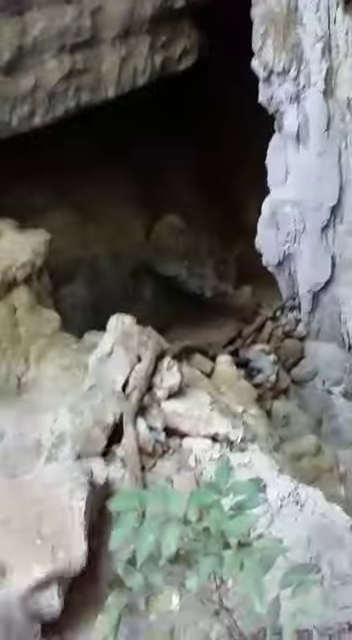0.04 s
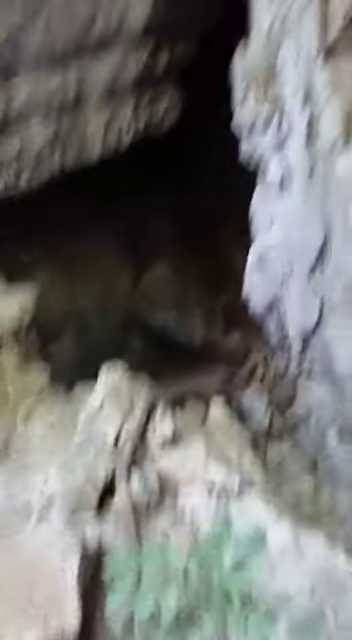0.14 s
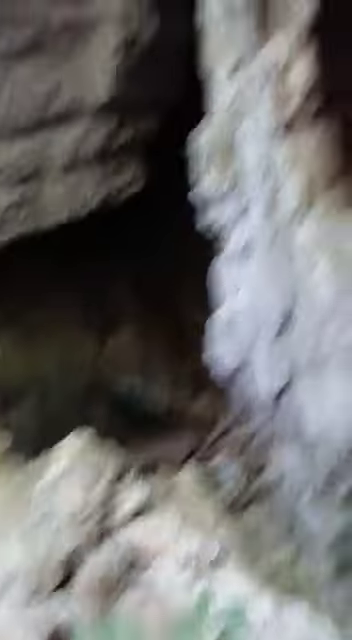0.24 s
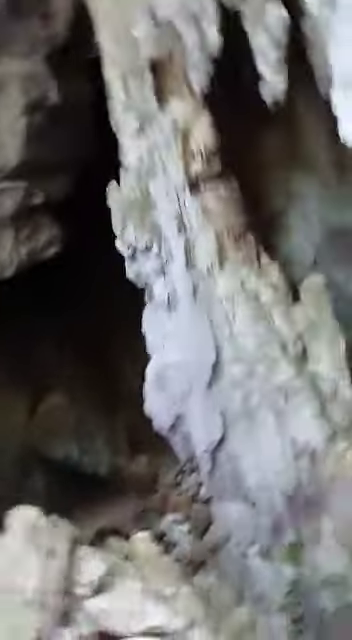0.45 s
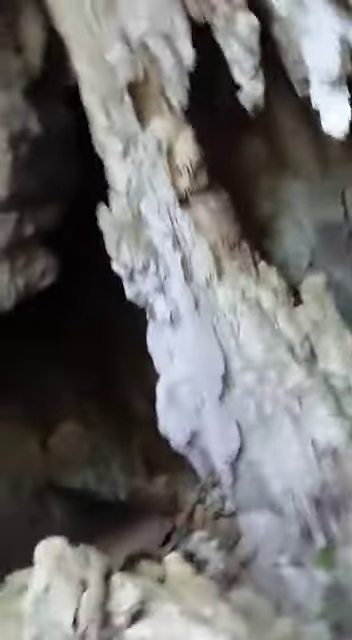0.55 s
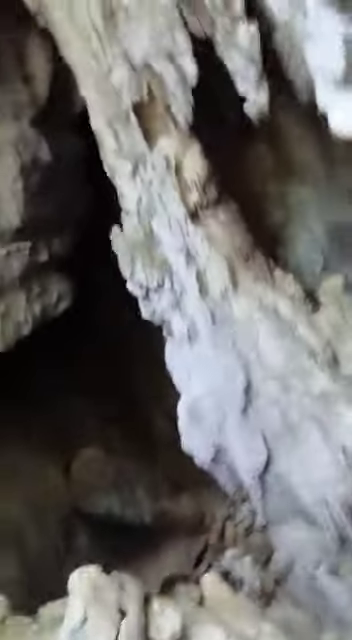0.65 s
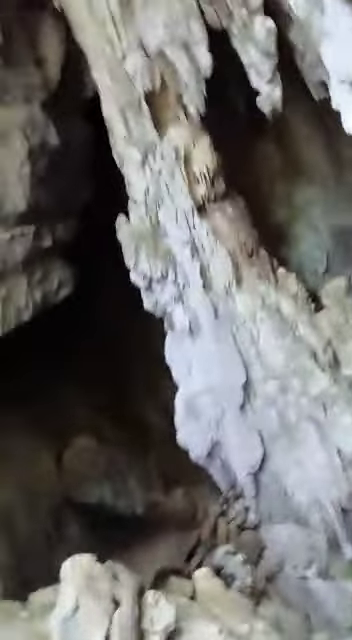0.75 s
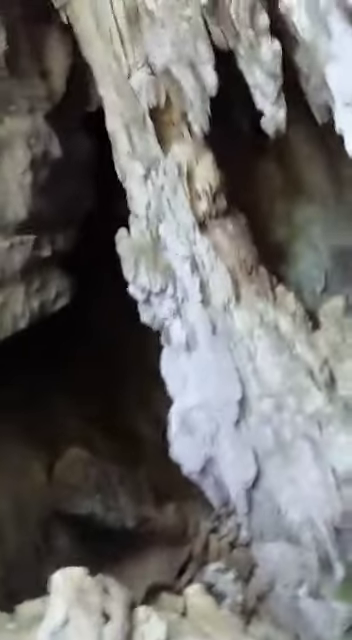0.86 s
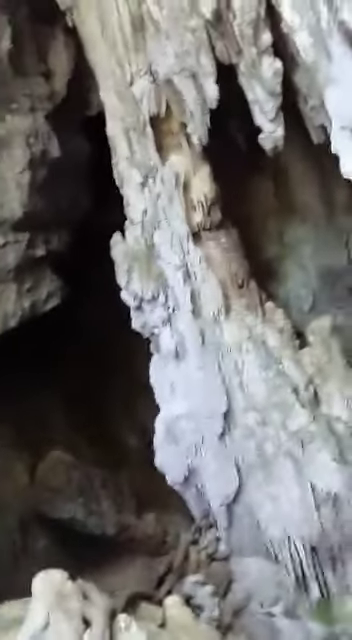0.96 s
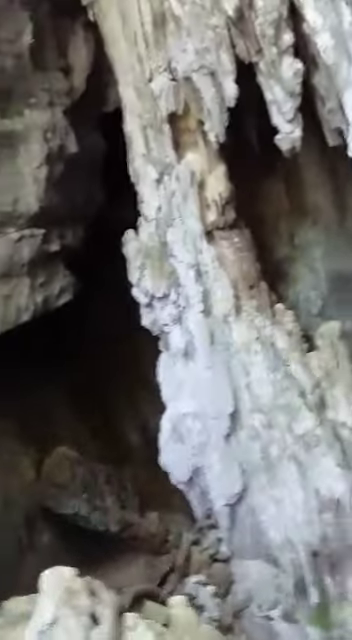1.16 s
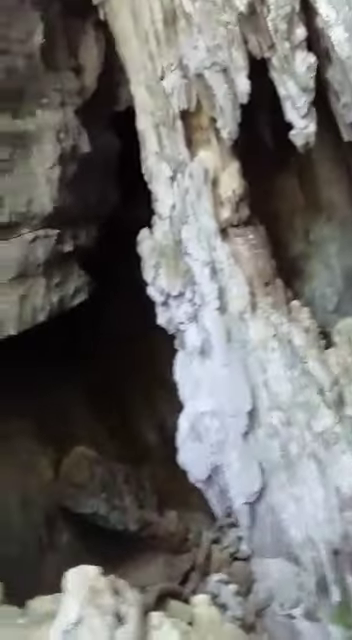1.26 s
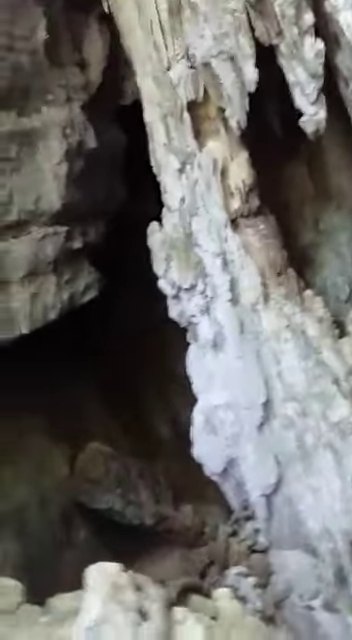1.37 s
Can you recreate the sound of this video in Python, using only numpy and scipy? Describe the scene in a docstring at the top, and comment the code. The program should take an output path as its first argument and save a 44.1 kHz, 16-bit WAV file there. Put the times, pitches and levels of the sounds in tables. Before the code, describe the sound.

A foot crunches down on loose rock and dry litter with brittle cracks and a small stone knock, then scuffs and settles softly. The cave mouth adds a short echo, over faint hiss and insects.

```python
"""A step at a limestone cave mouth

A foot comes down on loose rock and dry litter: brittle bits crack, a stone rings in its modes,
grit crunches as a swarm of tiny fractures, and the feet scuff and settle with soft thuds.
The rock walls answer with a short echo; insects shrill in narrow bands over a faint hiss."""
import sys
import numpy as np
from scipy import signal
from scipy.fft import rfft, irfft, next_fast_len
from scipy.io import wavfile

SR = 44100
rng = np.random.default_rng(int(sys.argv[2]) if len(sys.argv) > 2 else 0)


def store_pcm(level_fs):
    """Save levels as 16-bit WAV."""
    pcm = np.round(np.clip(level_fs, -1, 1) * 32767).astype(np.int16)
    wavfile.write(sys.argv[1], SR, np.atleast_2d(pcm).T)


N = 61739
TIME = np.arange(N) / SR


def from_db(db):
    """Amplitude grows tenfold for every 20 dB."""
    return 10 ** (np.asarray(db) / 20)


def unit_rms(x):
    """Normalisation to a mean power of one."""
    return x / np.sqrt(np.mean(x ** 2) + 1e-20)


def decay(t, t60):
    """Exponential damping: 60 dB in t60 seconds, from t = 0."""
    return np.exp(-np.log(1000) * np.maximum(t, 0) / max(t60, 1e-4))


def envelope(t, attack, hold, t60):
    """A transient rises linearly, holds, then decays exponentially."""
    return np.clip(t / max(attack, 1e-5), 0, 1) * decay(t - attack - hold, t60)


def strokes(rows):
    """The envelopes of overlapping foot movements add."""
    return sum(from_db(db) * envelope(TIME - s, attack, hold, t60) for s, db, attack, hold, t60 in rows)


def colour(x, spectrum):
    """Causal, minimum-phase filtering through (frequency_hz, gain_db) points."""
    size = 2 * next_fast_len(len(x))
    hz, db = np.transpose(spectrum)
    grid_hz = np.maximum(np.arange(size // 2 + 1) * SR / size, 1)
    gain = from_db(np.interp(np.log(grid_hz), np.log(hz), db))
    cepstrum = irfft(np.log(gain))
    cepstrum[1:size // 2] *= 2  # folding onto positive time gives minimum phase
    cepstrum[size // 2 + 1:] = 0
    return irfft(rfft(x, size) * np.exp(rfft(cepstrum)))[:len(x)]


def grains(spectrum, per_s, spread_db, t60_s=0.0029):
    """Shot noise: tiny fractures of uneven size come at random, and their decaying powers add."""
    sizes = from_db(spread_db * np.minimum(rng.exponential(1, N), 5))
    onsets = rng.random(N) < per_s / SR
    power = signal.lfilter([1], [1, -decay(1 / SR, t60_s) ** 2], onsets * sizes ** 2 + 1e-18)
    return unit_rms(colour(np.sqrt(power) * rng.standard_normal(N), spectrum))


def hiss(spectrum, level_db=0):
    """Filtering white noise gives stationary coloured noise."""
    noise = colour(rng.standard_normal(N + SR), spectrum)[SR:]
    return from_db(level_db) * unit_rms(noise)


def drift(knots_per_s):
    """Linear interpolation between Gaussian values gives a smooth random wander."""
    knots = rng.standard_normal(400)
    return np.interp(TIME * knots_per_s, np.arange(len(knots)), knots)


def shrill(hz, width_hz, db, waver_db, steadiness):
    """Far insects as narrow-band noise; compressing its envelope evens it towards a tone."""
    band = signal.butter(2, [hz - width_hz / 2, hz + width_hz / 2], "band", fs=SR, output="sos")
    noise = unit_rms(signal.sosfilt(band, rng.standard_normal(2 * SR + N)))
    analytic = signal.hilbert(noise)[SR:SR + N]
    evened = analytic.real / (np.abs(analytic) + .5) ** steadiness
    return from_db(db + waver_db * drift(knots_per_s=23)) * unit_rms(evened)


def air():
    """Broadband outdoor hiss sets the ambient noise floor."""
    # hiss spectrum: frequency_hz, gain_db
    spectrum = [(25, -29), (50, -7), (85, 1), (160, -4), (250, -15), (450, -17.5), (1000, -13), (1500, -8),
                (2100, 3), (2700, -1.5), (5200, -1.5), (7200, -12), (15500, -5.5)]
    return hiss(spectrum, level_db=-65.5)


def insects():
    """Incoherent sources add in power: two shrill bands and a far, sizzling chorus slowly fade."""
    # lower and upper band: pitch_hz, width_hz, base_level_db, waver_db, steadiness (0-1)
    bands = [(3082, 54, -65.5, 3, 0.26), (4263, 250, -63, 1.5, 0.3)]
    # fade of the lower band: time_s, gain_db
    lower_fade = [(0, 2.5), (.2, 2.5), (.6, 1), (.9, 1), (1.4, -2)]
    # fade of the upper band and chorus: time_s, gain_db
    upper_fade = [(0, 6), (.2, 4.5), (.8, -1.5), (1.4, -2)]
    # chorus spectrum: frequency_hz, gain_db
    spectrum = [(1000, -30), (1600, -25.5), (2100, -7.5), (2700, -9), (3900, -1), (5200, -2.5), (7200, -12),
                (15500, -19.5)]
    lower, upper = (shrill(*row) for row in bands)
    lower_gain = from_db(np.interp(TIME, *np.transpose(lower_fade)))
    upper_gain = from_db(np.interp(TIME, *np.transpose(upper_fade)))
    return lower_gain * lower + upper_gain * (upper + hiss(spectrum, -63.5))


def cave(x, delay_s=.0112, t60_s=0.58):
    """Convolution with the cave's impulse response: one near reflection, then a diffuse tail."""
    # colour of the reflected sound: frequency_hz, gain_db
    spectrum = [(100, 4), (1000, 1.5), (4000, 3), (8000, -8.5), (15000, -3)]
    tail = rng.standard_normal(N) * envelope(TIME, delay_s, 0, t60_s)
    response = from_db(-13) * tail / np.linalg.norm(tail)
    response[int(delay_s * SR)] += from_db(-21.5)  # the near wall
    return signal.fftconvolve(x, colour(response, spectrum))[:N]


def rumble():
    """Body movement modulates the amplitude of faint low noise."""
    # movements: start_s, level_db, attack_s, hold_s, t60_s
    movements = [(-.02, -78, 0.022, 0.565, 0.42), (1.1, -81.5, .03, .05, 0.16)]
    # rumble spectrum: frequency_hz, gain_db
    spectrum = [(25, -28), (60, -0.5), (130, 0.5), (300, -6), (600, -14.5), (1500, -33)]
    return strokes(movements) * hiss(spectrum)


def thuds(attack_s=0.0053):
    """Body weight pushing into the ground excites low damped oscillations."""
    # pushes: start_s, level_db, pitch_hz, t60_s
    pushes = [(0.223, -52.5, 114, 0.054), (.572, -58.5, 81, 0.07)]
    return sum(from_db(db) * np.sin(2 * np.pi * hz * (TIME - s)) * envelope(TIME - s, attack_s, 0, t60)
               for s, db, hz, t60 in pushes)


def litter():
    """Dry litter shifts and springs back elastically in sparse, bright ticks."""
    # stirs of the litter: start_s, level_db, attack_s, hold_s, t60_s
    stirs = [(-.02, -58, 0.017, 0.23, 0.26), (.4, -50.5, 0.015, 0.13, 0.41),
             (.69, -62.5, 0.017, 0.025, 2.1), (1.09, -64, 0.0068, 0.17, .5)]
    # tick spectrum: frequency_hz, gain_db
    spectrum = [(300, -24), (2000, -12), (5000, -3), (7000, -3), (8500, -1.5), (15500, -3.5)]
    return strokes(stirs) * grains(spectrum, per_s=450, spread_db=2)


def scuffs():
    """Sliding friction under the sole makes fine, dull grains that merge into noise."""
    # light drags: start_s, level_db, attack_s, hold_s, t60_s
    drags = [(.53, -56, 0.016, 0.036, 0.62), (.662, -52, 0.0088, 0.049, .32),
             (1.095, -49.5, 0.034, 0.033, 0.38), (1.32, -52.5, 0.077, .03, 0.28)]
    # friction spectrum: frequency_hz, gain_db
    spectrum = [(100, -31.5), (400, -15), (1000, -9.5), (1500, -4.5), (2200, 4.5), (2800, -3), (4300, 4),
                (5300, 0), (7000, -6.5), (8500, -4), (15500, -12.5)]
    return strokes(drags) * grains(spectrum, per_s=9000, spread_db=1.8)


def crunches():
    """Grit fractures densely under compression while weight is on the sole."""
    # presses of the sole: start_s, level_db, attack_s, hold_s, t60_s
    presses = [(.219, -38.5, 0.0027, 0.07, 0.078), (.312, -32.5, .008, 0.0075, 0.052),
               (.338, -32, 0.008, 0.05, 0.12), (.473, -38.5, 0.0064, 0.025, 0.17)]
    # grit spectrum: frequency_hz, gain_db
    spectrum = [(40, -36), (90, -23), (200, -13.5), (400, -6.5), (1000, -4.5), (1600, -5), (2300, 2),
                (3300, 0.5), (4100, -1), (4900, 4), (6100, 3.5), (6900, -3.5), (8200, 4), (11500, -1.5),
                (15500, -1.5)]
    return strokes(presses) * grains(spectrum, per_s=3500, spread_db=4)


def knock(start_s=.2829, base_db=-21):
    """A loose stone tips against its neighbour and rings in damped modes of alternating sign."""
    # modes of the stone: pitch_hz, relative_level_db, t60_s
    modes = [(792, -9, 0.013), (1194, -1, 0.017), (1683, -0.5, 0.013), (1953, 0, 0.017), (2340, -7, 0.023),
             (4544, -11, 0.048), (5920, -7.5, 0.048)]
    t = np.maximum(TIME - start_s, 0)
    return sum((-1) ** k * from_db(base_db + db) * np.sin(2 * np.pi * hz * t) * decay(t, t60)
               for k, (hz, db, t60) in enumerate(modes))


def cracks(attack_s=0.00073, hold_s=0.00026, ring_t60_s=0.077):
    """Brittle fracture: each bit emits a sharp burst and a faint ring, coloured by its resonance."""
    # breaking bits: start_s, base_level_db, low_mid_db, treble_db, resonance_hz, t60_s
    bits = [(0.0418, -46.5, -9, -2, 10600, 0.0059), (0.0607, -42, -31, -14, 5200, .006),
            (.1871, -44, -13, 3.5, 14200, .004), (.2201, -29, -13, 3.5, 13700, .008),
            (0.231, -36, -24, 0, 6500, .007), (0.2386, -34.5, -18, 1, 13400, .01),
            (0.2563, -27, -15.5, 1.5, 7740, 0.016), (.2605, -29, -20, -5, 4300, 0.006),
            (0.2672, -34.5, -1.5, -10, 1860, 0.017), (0.2841, -24, -8, -2.5, 6140, 0.01),
            (0.302, -32.5, -2, -21, 3360, 0.0051), (0.325, -25.5, 0.5, -8.5, 2300, 0.0057),
            (0.3451, -29, 1.5, -8, 5000, .006), (0.3529, -23, -5.5, -3, 9400, 0.0058),
            (.3605, -26, -3, -3, 11400, 0.005), (0.3712, -22, -10, -8.5, 8500, 0.0073),
            (0.378, -25, -9.5, -3.5, 4830, 0.01), (0.3896, -27, -13, -5, 6100, 0.0093),
            (.3938, -25.5, -8.5, 2, 5650, 0.0041), (.4628, -46, -15, 3, 13000, 0.0059),
            (0.482, -36, 2, 0.5, 10300, 0.0079), (0.487, -41, -11, 6, 8500, .006),
            (0.4992, -44, -3.5, 3, 2440, 0.0091), (0.5021, -31, -9, -2, 8400, 0.0087),
            (0.5175, -43.5, 5.5, 5, 2420, 0.0086), (0.6678, -45, -5, 2.5, 10800, 0.013),
            (.6739, -43, -11, 6, 14700, .008), (.7249, -39, -10.5, 1, 5000, 0.0088),
            (0.7637, -42.5, -5, -6.5, 13900, 0.0038), (0.962, -52.5, -7, 2, 8900, 0.02),
            (1.0229, -59, -16, 6, 11800, .008), (1.1056, -48.5, -18, 2.5, 13800, 0.015),
            (1.1181, -37.5, -21, -6.5, 4840, 0.014), (1.196, -42, -0.5, -22, 4000, 0.0066)]
    # colour common to all cracks: frequency_hz, gain_db
    spectrum = [(80, -26), (300, -10.5), (900, -2), (2200, 4.5), (3000, 1), (5200, 5.5), (6200, 4),
                (6900, 1), (8200, 4.5), (15500, 3.5)]
    t = TIME[:SR // 20]
    ring = from_db(-11.5) * envelope(t, attack_s, 0, ring_t60_s)
    out = np.zeros(N + SR)
    for start_s, db, low_mid_db, treble_db, hz, t60 in bits:
        shape = envelope(t, attack_s, hold_s, t60) + ring
        burst = unit_rms(shape * rng.standard_normal(len(t))) * np.sqrt(np.mean(shape ** 2))
        resonance = from_db(0.5) * signal.lfilter(*signal.iirpeak(hz, Q=9.2, fs=SR), burst)
        tilt = [(2030, low_mid_db), (5300, 0), (12200, treble_db)]
        start = int(start_s * SR)
        out[start:start + len(t)] += from_db(db) * colour(burst + resonance, tilt)
    return colour(out[:N], spectrum)


def scene():
    """Superposition of the feet, their echo and the outdoor background, in mono."""
    feet = cracks() + crunches() + scuffs() + litter() + knock() + thuds()
    return (feet + cave(feet) + insects() + air() + rumble())[None]


def record(dry):
    """Band limiting: an elliptic low-pass cuts steeply above 15.8 kHz."""
    return signal.sosfilt(signal.ellip(12, .2, 70, 15800, fs=SR, output="sos"), dry)


dry = scene()
out = record(dry)
store_pcm(out)
```